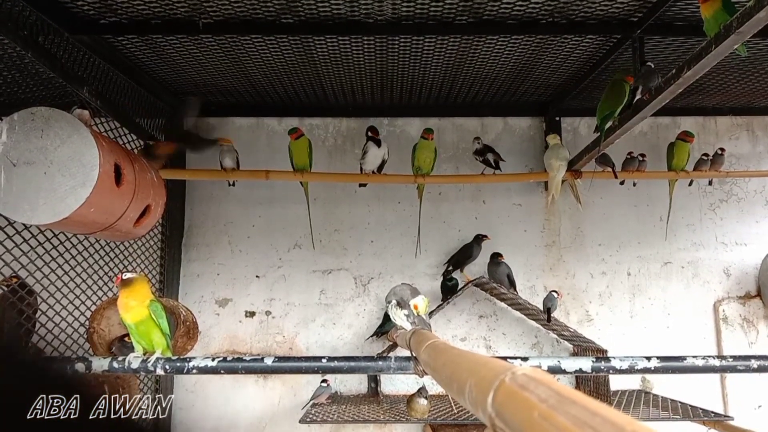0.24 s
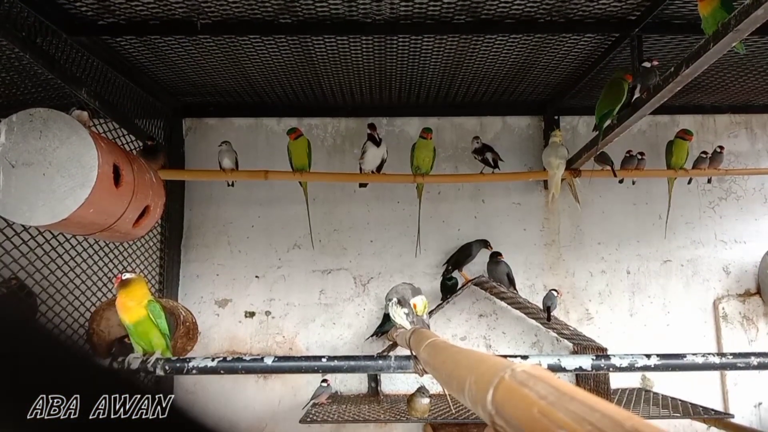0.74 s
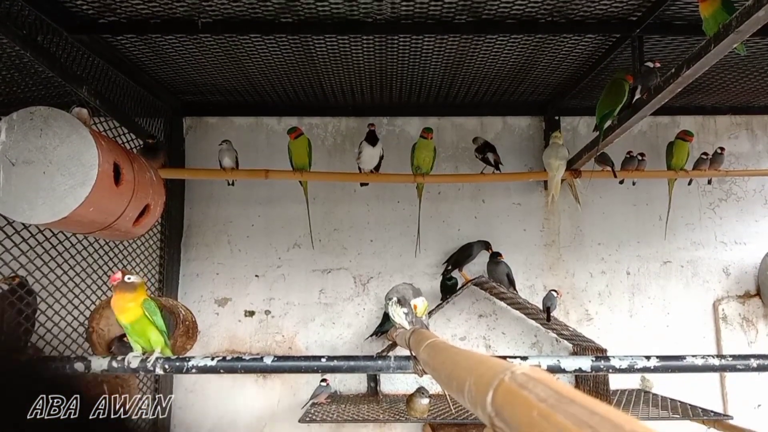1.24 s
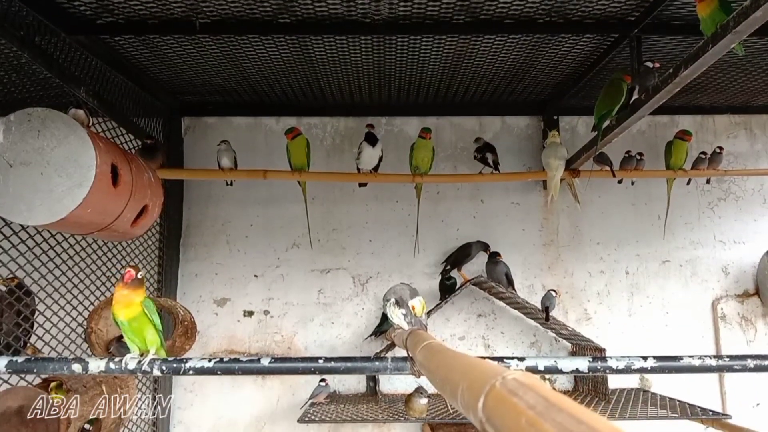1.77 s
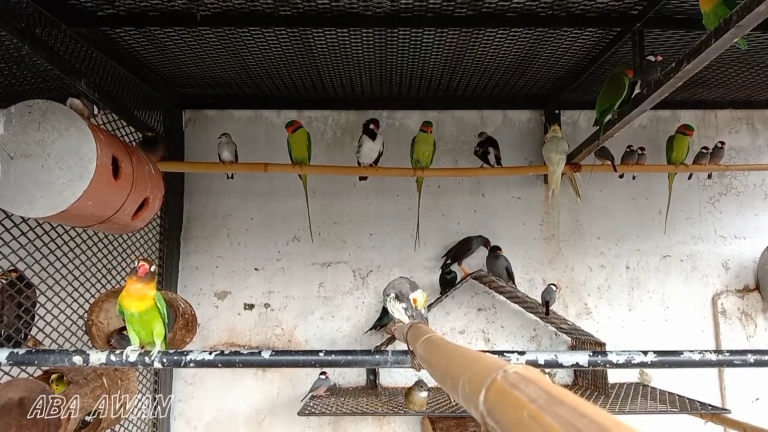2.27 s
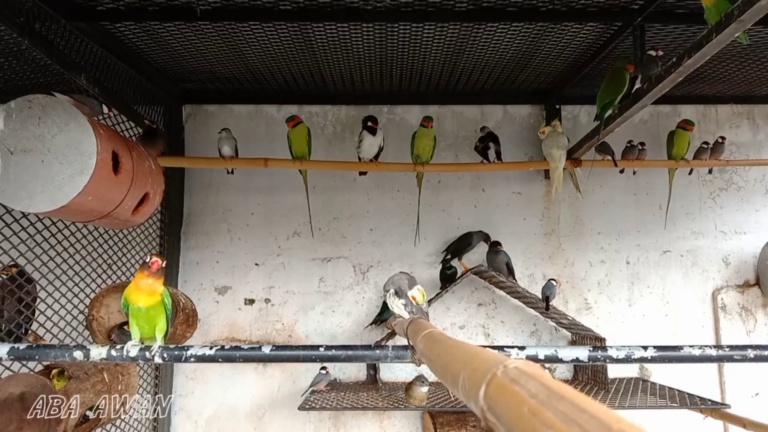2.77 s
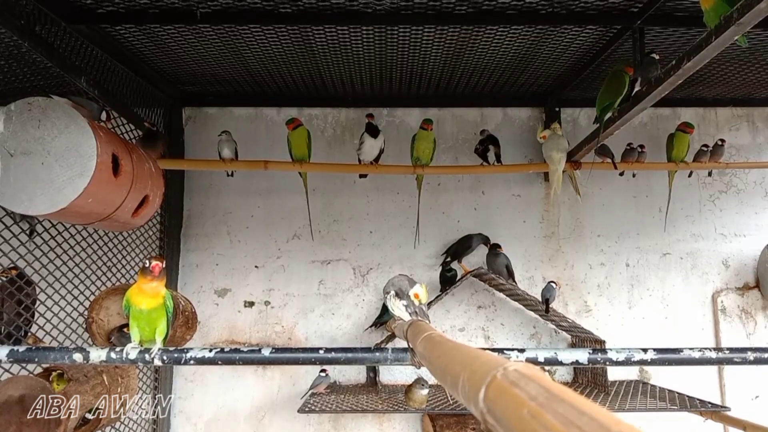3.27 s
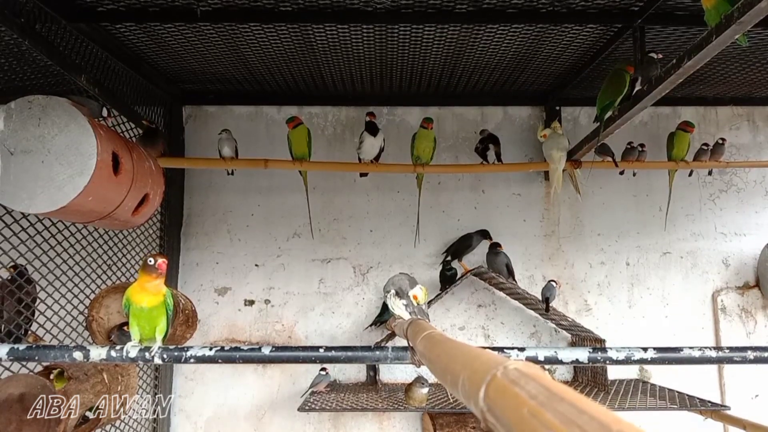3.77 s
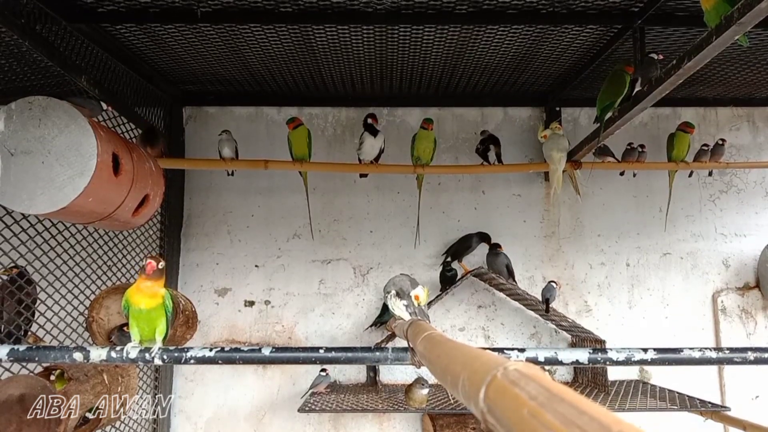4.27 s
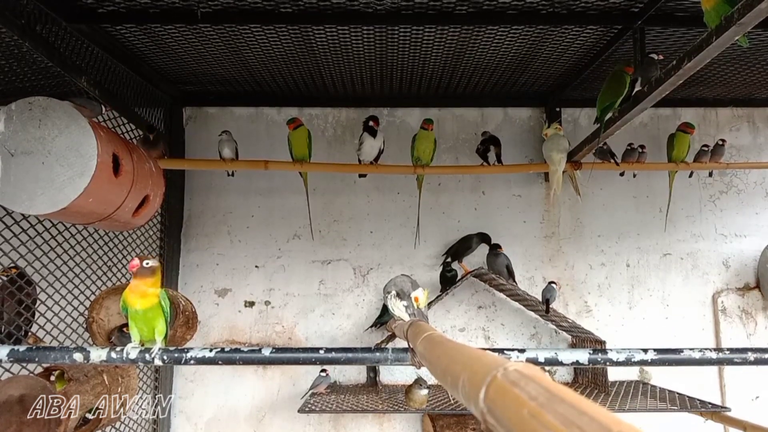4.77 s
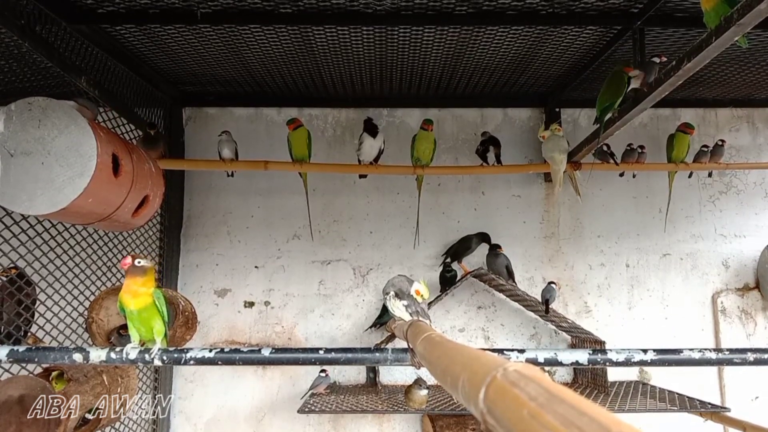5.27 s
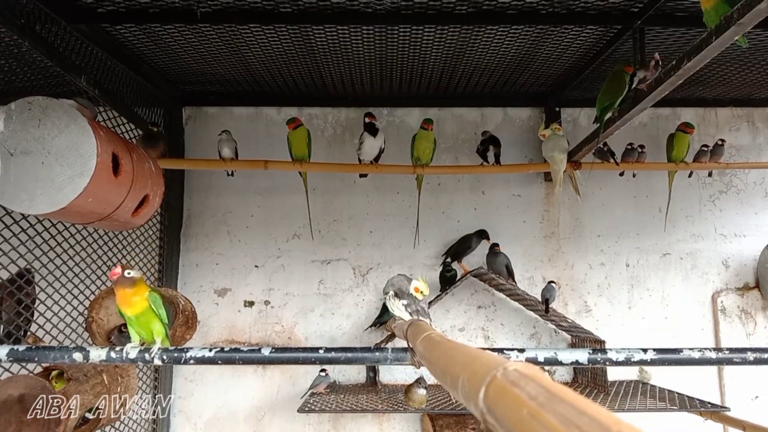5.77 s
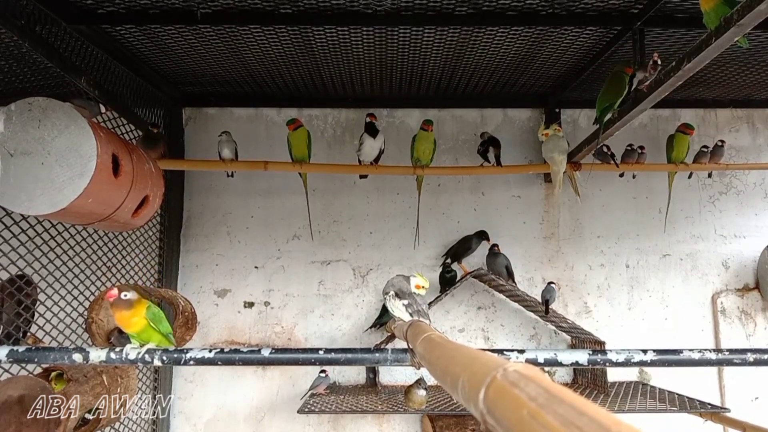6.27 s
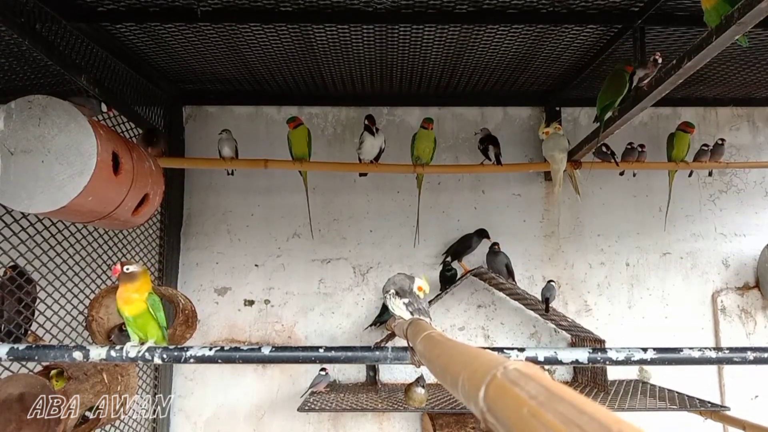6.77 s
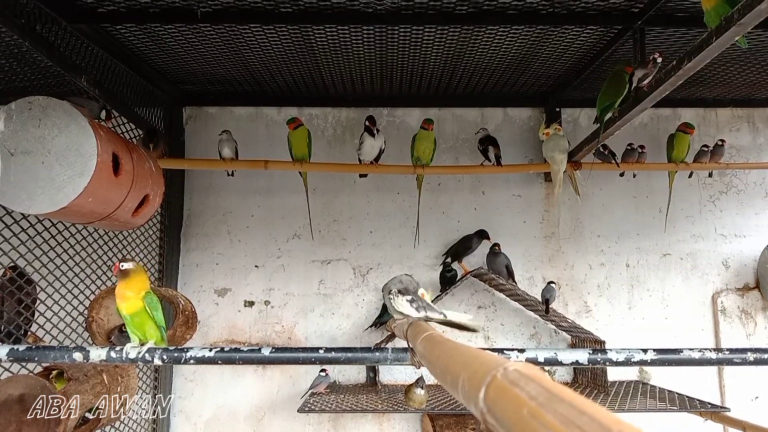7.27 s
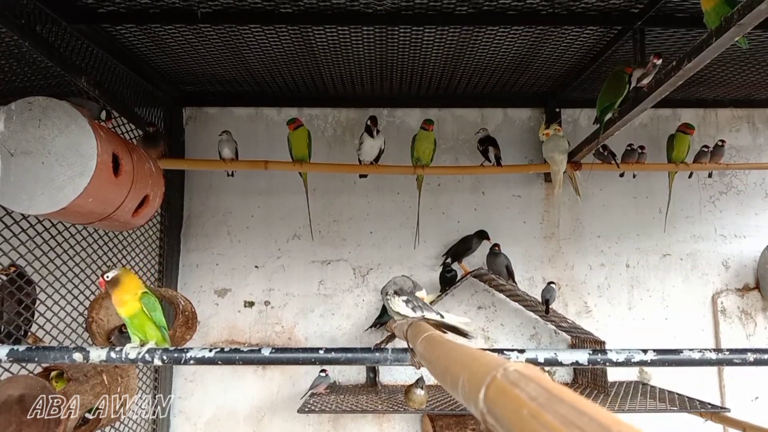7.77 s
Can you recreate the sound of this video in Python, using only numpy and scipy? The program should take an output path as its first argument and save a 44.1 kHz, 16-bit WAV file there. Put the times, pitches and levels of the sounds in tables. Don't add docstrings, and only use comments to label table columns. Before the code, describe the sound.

Sparse squawks and squeals in an echoing bird enclosure build to loud, quick finch chips, a fading trill and two smooth rise-and-fall whistles.

```python
import sys
import numpy as np
from scipy import signal
from scipy.fft import rfft, irfft, next_fast_len
from scipy.io import wavfile
from scipy.ndimage import uniform_filter1d, map_coordinates

SR = 44100
rng = np.random.default_rng(int(sys.argv[2]) if len(sys.argv) > 2 else 0)


def volts_from_db(level):
    exponent = np.asarray(level, float) / 20
    return 10 ** exponent


def dump_mix(stems):
    frames = np.atleast_2d(stems).T
    limited = np.clip(frames, -1, 1)
    pcm = np.round(limited * 32767).astype(np.int16)
    wavfile.write(sys.argv[1], SR, pcm)


N = 354563
TOP_HZ = 16100


def unit(x):
    return x / np.sqrt(np.mean(x ** 2) + 1e-20)


def along(points, hz):
    f, v = np.transpose(points)
    return np.interp(np.log(hz + 1), np.log(f + 1), v)


def wobble(n, rate):
    knots = rng.standard_normal(int(n * rate / SR) + 4)
    return map_coordinates(knots, [np.arange(n) * rate / SR])


def coloured(spectrum, n):
    m = next_fast_len(n + 512)
    gain = volts_from_db(along(spectrum, np.fft.rfftfreq(m, 1 / SR)))
    return unit(irfft(rfft(rng.standard_normal(m)) * gain, m)[:n])


def patchy(x, depth_db=5):
    z = signal.stft(x, nperseg=512)[2]
    field = uniform_filter1d(rng.standard_normal(z.shape), 4, 0)
    field = uniform_filter1d(field, 8, 1)
    return unit(signal.istft(z * volts_from_db(depth_db * unit(field)), nperseg=512)[1][:N])


def add(track, s, x):
    part = track[max(round(s * SR), 0):][:len(x)]
    part += x[:len(part)]


def traffic_and_yard():
    # time in seconds, level in dB.
    passing = [(0.0, -62), (0.4, -57), (0.65, -62), (0.92, -55), (1.1, -64.5), (2.4, -60), (2.6, -55),
               (3.3, -55), (3.6, -61), (4.3, -57), (4.7, -64), (5.2, -64), (5.45, -58), (5.7, -63),
               (6.4, -62), (6.55, -53.5), (7.45, -55), (8.04, -62)]
    # frequency in Hz, level in dB per Hz.
    rumble_spectrum = [(20, -27.5), (50, -14.5), (90, 3.5), (125, -5), (165, -2), (230, -18), (400, -30.5),
                       (1200, -103)]
    # frequency in Hz, level in dB per Hz.
    murmur_spectrum = [(120, -28), (250, -5), (500, -5.5), (1000, -8), (1500, -3), (1900, -11), (3000, -15),
                       (4200, -22), (7400, -31.5), (7800, -14), (10000, -25.5), (11500, -49.5),
                       (16000, -56.5)]
    traffic_db = np.interp(np.arange(N) / SR, *np.transpose(passing))
    rumble = volts_from_db(traffic_db - 0.5 + 4.3 * wobble(N, 21)) * coloured(rumble_spectrum, N)
    swing_db = 0.15 * (traffic_db - traffic_db.mean())
    return rumble + volts_from_db(-54 + swing_db) * patchy(coloured(murmur_spectrum, N))


def motor():
    # frequency in Hz, level in dB.
    tones = [(3138, -39), (3924, -48), (4705, -53.5), (5480, -59.5), (6272, -70)]
    # start in seconds, length in seconds, level in dB.
    spells = [
        (-.04, 1.79, -7.5),
        (1.983, 0.44, -9.5),
        (2.632, 0.51, -6.5),
        (3.25, .3, -9),
    ]
    t = np.arange(N) / SR
    running, whine = np.zeros(N), np.zeros(N)
    for s, length, db in spells:
        running += volts_from_db(db) * np.clip(np.minimum(t - s, s + length - t) / 0.063, 0, 1)
    for hz, db in tones:
        whine += volts_from_db(db + 4 * wobble(N, 9)) * np.sin(2 * np.pi * hz * t + 0.89 * wobble(N, 42))
    return running * whine


def aviary(x):
    # frequency in Hz, decay time to -60 dB in seconds.
    decay_times = [(300, 0.046), (1500, 0.34), (5000, 0.26), (12000, 0.25)]
    hz, t, z = signal.stft(rng.standard_normal(SR // 2), SR, nperseg=256)
    decay = volts_from_db(-60 * t / along(decay_times, hz)[:, None])
    tail = signal.istft(z * decay, SR, nperseg=256)[1]
    delayed = np.pad(x, (150, 0))
    return signal.fftconvolve(delayed, tail / np.linalg.norm(tail))[:N]


def syrinx(hz, levels_db, rough, flutter_hz, breath_db=-30):
    n = len(hz)
    hoarse = 0.45 * volts_from_db(breath_db) * wobble(n, 900)
    phase = 2 * np.pi * np.cumsum(hz * (1 + rough * wobble(n, flutter_hz))) / SR + hoarse
    tone = np.zeros(n)
    for k, db in enumerate(levels_db, 1):
        tone += volts_from_db(db) * np.sin(k * phase) * (k * hz < TOP_HZ)
    swing = volts_from_db(60 * rough * wobble(n, flutter_hz))
    breath = volts_from_db(breath_db) * wobble(n, 1800) + volts_from_db(breath_db - 19) * wobble(n, 9000)
    return np.sqrt(2) * tone * (swing + breath)


def calls(tables, rough, flutter_hz, breath_db, upper_db, octave_db=None, edge=0.0036):
    track = np.zeros(N)
    for rows in tables:
        s, *cols = np.transpose(rows)
        t = np.arange(s[0], s[-1], 1 / SR)
        smooth = 100 + round(edge * SR)
        hz, db, *second = [uniform_filter1d(np.interp(t, s, c), size=smooth) for c in cols]
        octave = second[0] if second else db + octave_db
        fade = np.clip(np.minimum(t - s[0], s[-1] - t) / edge, 0, 1)
        levels = [db, octave] + [octave + u for u in upper_db]
        add(track, s[0], fade * syrinx(hz, levels, rough, flutter_hz, breath_db))
    return track


def contour(rows, peak_at, bent, rise_db, fall_db):
    return [[(s, a, db - rise_db), (s + peak_at * length, a + bent * (b - a), db), (s + length, b, db - fall_db)]
            for s, length, a, b, db in rows]


def far_birds():
    # start in seconds, length
    # in seconds, first and last pitch in Hz, peak in dB.
    warbles = [(0.235, 0.057, 3350, 2667, -39), (4.56, 0.055, 3095, 3560, -36),
               (0.56, 0.046, 2690, 2610, -44), (0.73, 0.2, 2780, 2960, -50), (2.78, .05, 1900, 2000, -41),
               (2.81, .12, 2500, 2950, -39), (7.73, .06, 5200, 6100, -42), (7.73, .05, 8000, 8500, -46),
               (3.2, 0.19, 1978, 3200, -37), (4.33, 0.12, 3580, 2473, -36.5), (4.79, 0.03, 2500, 2994, -44),
               (4.95, 0.2, 3790, 4410, -40), (5.36, 0.092, 2442, 3230, -30), (5.6, 0.08, 2786, 3270, -36.5)]
    # start in seconds, length in seconds, first and last pitch in Hz, peak in dB.
    pips = [(0.11, 0.046, 2985, 2440, -37.5), (.17, 0.06, 2125, 1750, -48), (0.63, 0.033, 3010, 2610, -41),
            (1.37, 0.078, 2172, 1810, -41.5), (1.67, 0.036, 1800, 1970, -35), (2.6, 0.09, 3250, 3550, -35),
            (4.53, 0.072, 2730, 2736, -36.5), (4.725, 0.051, 2630, 2590, -37), (4.83, .05, 3585, 3045, -35),
            (5.06, .13, 2050, 2450, -36), (5.255, 0.065, 3000, 3400, -32), (5.885, .07, 3900, 3200, -35),
            (5.62, .04, 3700, 3000, -35), (5.37, 0.038, 3100, 3300, -35), (0.62, .05, 2600, 4000, -47.5),
            (0.644, 0.045, 4100, 3700, -44), (0.75, 0.091, 1900, 1300, -53), (2.73, .05, 5000, 3400, -43),
            (1.38, 0.058, 3100, 2500, -49), (1.68, 0.048, 2700, 2500, -43.5),
            (7.33, 0.17, 2086, 3270, -49.5), (7.68, 0.02, 4200, 2660, -32),
            (7.32, 0.073, 4100, 4950, -47.5)]
    # start in seconds, length in seconds, first and last pitch in Hz, peak in dB.
    dove_coos = [
        (3.27, 0.116, 800, 900, -57),
        (3.47, 0.16, 850, 800, -52),
        (3.75, 0.18, 1248, 896, -53),
        (0.76, 0.122, 750, 680, -58),
        (3.83, 0.12, 292, 308, -49),
        (4.05, .18, 280, 345.5, -51.5),
        (6.82, .2, 319, 319, -53.5),
        (7.1, .19, 343, 312, -49),
        (1.55, 0.12, 297, 320, -61.5),
    ]
    # start in seconds, length in seconds, pitch in Hz, level in dB.
    drones = [
        (1.198, 0.061, 1630, -47.5),
        (2.019, 0.06, 1196, -49),
        (2.233, 0.12, 1637, -57),
        (2.284, 0.062, 1230, -53),
        (2.572, 0.23, 1315, -55),
        (3.241, 0.25, 1280, -54),
        (3.4, 0.17, 1200, -58),
        (3.77, 0.13, 473, -55.5),
        (7.695, 0.11, 1340, -53.5),
        (4.866, 0.069, 1904, -39),
    ]
    songs = contour(warbles, .6, 1.0, 5.1, 0.75) + contour(pips, .1, 0.3, 3.9, 7.7)
    coos = contour(dove_coos, 0.24, .45, 1.4, 3.7)
    steady = [[(s, hz, db), (s + length, hz, db)] for s, length, hz, db in drones]
    stutter = volts_from_db(3 * wobble(N, 60))
    far = stutter * calls(songs, .04, 220, -12, [], -32, .01)
    return far + volts_from_db(4 * wobble(N, 14)) * calls(coos + steady, .015, 40, -14, [], -30, .02)


def knocks():
    # time in seconds, peak in dB.
    ticks = [
        (0.5824, -47),
        (2.704, -30.5),
        (2.7535, -53),
        (2.8003, -39),
        (2.846, -34.5),
        (3.223, -35.5),
        (3.244, -27),
        (3.3656, -32.5),
        (6.177, -30),
        (6.282, -26),
    ]
    # time in seconds, level in dB, frequency in Hz.
    s_perch, db_perch, hz_perch = (7.81, -31, 160)
    beak = [(4000, -36), (5500, 17), (10000, -4.5), (11000, -67), (16000, -90)]  # Hz, dB per Hz
    track, t = np.zeros(N), np.arange(SR // 10) / SR
    for s, db in ticks:
        add(track, s, volts_from_db(db - 60 * t / 0.013) * (1 - np.exp(-t / 0.0005)) * coloured(beak, len(t)))
    envelope = volts_from_db(db_perch - 60 * t / 0.11) * (1 - np.exp(-t / 0.0086))
    add(track, s_perch, envelope * np.sin(2 * np.pi * hz_perch * t))
    return track


def rasps():
    # time in seconds, peak in dB,
    # length in seconds, brightness in dB per octave.
    squawks = [(0.246, -25.5, 0.16, -2), (0.333, -16.5, 0.096, 8), (1.83, -43, 0.08, 4),
               (2.51, -40, 0.098, 5), (3.7, -18, .09, 11), (4.3, -18, .1, 8), (3.92, -21.5, .1, 9.5),
               (4.4, -25, .1, 16.5), (3.57, -29.5, .1, 12.5), (7.94, -24, 0.087, 10), (8.02, -23, .07, 4),
               (1.4, -38, .06, -4), (6.2, -24.5, .14, 13), (1.944, -32, 0.32, -4), (2.575, -21, 0.11, 3.5),
               (2.74, -28.5, 0.11, -2), (3.2663, -24.5, 0.13, 1.5), (4.35, -30, 0.13, 3),
               (5.065, -15.5, 0.094, 2.5), (5.1825, -23, 0.26, 1.5), (5.4655, -15, 0.12, 1),
               (5.688, -19.5, 0.096, -1), (5.9023, -20.5, 0.12, -2), (6.11, -19.5, 0.15, -0.5),
               (7.892, -27.5, 0.06, 5.5), (7.202, -29.5, 0.11, -7), (1.119, -24, 0.12, 13.5),
               (0.628, -48, 0.37, 12)]
    # frequency in Hz, level in dB per Hz.
    throat = [(300, -90), (700, -35), (1400, -13), (2000, -15), (2800, -2), (4100, -15), (5400, -8),
              (6800, -19), (8000, -16), (9200, -38), (14000, -33), (16000, -48)]
    track = np.zeros(N)
    for s, db, length, bright_db in squawks:
        n = round(length * SR) + 99
        u = np.arange(n) / n
        tilted = [(hz, level + bright_db * np.log2(hz / 3000)) for hz, level in throat]
        wide = coloured([(hz * 1.04, level) for hz, level in tilted], n)
        shut = coloured([(hz * 0.9, level) for hz, level in tilted], n)
        gate = volts_from_db(2.2 * wobble(n, 300.5)) * np.sin(np.pi * u) ** 2
        add(track, s - .03, volts_from_db(db - 10) * gate * (np.sqrt(1 - u) * wide + np.sqrt(u) * shut))
    return track


def pipers():
    # start in seconds, length in seconds, first and last pitch in Hz, peak in dB.
    piping = [
        (6.338, 0.14, 2850, 2706, -25),
        (6.558, 0.13, 3000, 2681, -22),
    ]
    # time in seconds, pitch in Hz, fundamental in dB, octave in dB.
    rise = [
        [(7.7, 1212, -58, -44.5), (7.75, 1425, -56, -31.5), (7.8, 1615, -40.5, -30), (7.85, 1715, -40.5, -27.5),
         (7.93, 1690, -55, -25.5), (8.0, 1714, -62, -44.5)],
    ]
    piped = calls(contour(piping, 0.06, .7, 9.5, 4), 0.0058, 200, -23.5, [-4, -22], -14.0)
    return piped + calls(rise, 0.004, 160, -15, [-25, -23.5, -18.5, -31, -34.5])


def whistler():
    # time in seconds, pitch in Hz, level in dB.
    arches = [
        [(4.45, 1070, -41), (4.554, 1174, -21), (4.64, 1364, -22.5), (4.724, 1603, -23), (4.836, 1764, -27),
         (4.88, 1740, -34), (4.93, 1543, -26), (5.04, 1036, -32.5), (5.12, 960, -62)],
        [(6.765, 1032, -35), (6.93, 1168, -19.5), (7.0, 1354, -20), (7.11, 1830, -23), (7.22, 1928, -28),
         (7.3, 1603, -20), (7.36, 1190, -23.5), (7.42, 924, -38), (7.52, 850, -52.5)],
    ]
    return calls(arches, .003, 60, -42, [], -70, .025)


def chips(rows, length, drop, fall, sag, half_db, breath_db, lead, early=1):
    track, t = np.zeros(N), np.arange(1, round(length * SR)) / SR
    swing = np.abs(np.sin(np.pi * (t / length) ** early)) + 1e-6
    for s, db, hz, octave_db in rows:
        onset = drop * rng.uniform(0.7, 1.2) * np.exp(-((t - lead / 2) / fall) ** 2)
        glide = hz / 2 * (1 + onset - sag * (t / length) ** 3)
        upper = db - 11.0 + octave_db + 20 * np.log10(swing)
        levels = [db - 13.5 + half_db, db - 7.5, db - 16 + half_db, upper, db - 27.5 + half_db, upper - 8]
        add(track, s - lead, swing * syrinx(glide, levels, 0.024, 457, breath_db))
    return track


def finches():
    # time in seconds, peak in dB, pitch in Hz, octave in dB.
    series = [
        (4.2725, -6.5, 5500, -9),
        (4.4566, -7.5, 5580, -14),
        (4.5136, -8.5, 5086, -3.5),
        (4.6635, -6.5, 5450, -5.5),
        (4.7791, -6.5, 5310, -7.5),
        (4.8899, -7, 5480, -10.5),
        (4.9988, -8.5, 5490, -11.5),
        (5.1, -5, 5520, -14),
        (5.1862, -7, 5245, -12),
        (5.2983, -5, 5230, -12.5),
    ]
    # time in seconds, peak in dB, pitch in Hz, octave in dB.
    trill = [
        (6.461, -10, 5470, -34),
        (6.5445, -9.5, 5295, -50),
        (6.6257, -12.5, 5240, -39.5),
        (6.6972, -15, 5483, -36),
        (6.767, -12, 5440, -58),
        (6.8316, -15, 5270, -37.5),
        (6.8995, -17, 5400, -26),
        (6.971, -22.5, 5470, -38),
        (7.0675, -24.5, 5280, -37),
    ]
    # time in seconds, peak in dB, pitch in Hz, octave in dB.
    chatter = [
        (0.119, -37, 5340, -26),
        (0.205, -39.5, 4920, -22),
        (3.6025, -7.5, 5420, -12.5),
        (6.2815, -13, 4755, -16),
        (7.82, -29, 4410, -27),
    ]
    # time in seconds, peak in dB, pitch in Hz, octave in dB.
    flicks = [(1.323, -13.5, 5890, -13), (2.572, -17, 4920, -33), (3.688, -8.5, 5435, -6.5),
              (3.715, -13, 5110, -8), (3.8218, -9, 4904, -6.5), (3.838, -9, 5110, -7),
              (3.8702, -9, 5214, -11.5), (3.885, -13, 4970, -12), (3.9035, -7, 5560, -12),
              (3.925, -14.5, 5710, -7.5), (3.9477, -7.5, 5395, -12.5), (7.959, -8.5, 5340, -9.5),
              (8.003, -11, 5180, -11.5), (8.016, -5.5, 5540, -16), (8.032, -8, 5800, -12.5)]
    flock = chips(series, 0.032, .28, .003, 0.03, -26, -19, 0.007, early=.7)
    flock += chips(trill, 0.024, 0.13, 0.012, 0.034, -17, -21, 0.009)
    flock += chips(chatter, 0.0232, 0.04, 0.0063, .05, -16, -11, 0.0074)
    return flock + chips(flicks, 0.017, -0.1197, 0.00486, -0.038, -14, -7, .004, early=.8)


def parrots():
    # time in seconds, pitch in Hz, fundamental in dB, octave in dB.
    arch = [
        [(1.012, 2550, -34.5, -16), (1.03, 3715, -25, -34), (1.05, 3220, -22.5, -21.5),
         (1.075, 3004, -34.5, -21), (1.1, 3184, -29.5, -32), (1.16, 3150, -41, -33)],
    ]
    # time in seconds, pitch in Hz, fundamental in dB, octave in dB.
    screech = [
        [(7.914, 2300, -44, -20.5), (7.925, 2250, -38, -23), (7.945, 2400, -31, -22), (7.97, 2417, -35, -25.5),
         (8.0, 2430, -34, -27), (8.04, 2442, -40, -36)],
    ]
    # start in seconds, length in seconds, first and last pitch in Hz, peak in dB.
    squeals = [
        (1.22, 0.046, 3486, 2752, -30),
        (0.42, .055, 2395, 2418, -31.5),
        (2.0, 0.059, 3725, 3230, -35),
        (3.405, 0.035, 2564, 2725, -27.5),
        (3.53, 0.094, 3457, 2956, -27),
        (4.0, 0.054, 2950, 3166, -27),
    ]
    shrieks = [
        (1.1, 0.071, 3906, 4224, -25),
        (1.235, 0.03, 5750, 3930, -24.5),
        (1.945, 0.05, 5220, 5010, -26.5),
        (3.67, .08, 4040, 5330, -29),
        (4.04, 0.028, 4800, 4010, -24.5),
    ]
    quacks = [
        (0.65, 0.014, 1970, 2020, -32.5),
        (1.355, 0.085, 1318, 1328, -29),
        (1.665, 0.067, 1298, 1380, -33.5),
        (1.94, 0.11, 1804, 2088, -37),
        (4.16, 0.087, 1880, 2020, -39.5),
    ]
    cheeps = [
        (1.53, 0.021, 2470, 2380, -40.5),
        (1.91, 0.065, 2458, 2580, -39.5),
    ]
    scolds = [
        (.298, 0.084, 1367, 1671, -30.5),
        (.485, 0.081, 1492, 2073, -33.5),
        (4.31, .13, 1800, 1250, -36),
        (1.8, 0.05, 1500, 1534, -42.5),
        (2.11, 0.061, 1492, 1367, -41),
    ]
    mellow = [
        (6.177, 0.06, 5340, 5110, -27),
        (6.185, 0.037, 3230, 3500, -32.5),
        (6.225, .06, 3625, 2987, -26.5),
        (6.305, 0.045, 6880, 5770, -23.5),
        (6.22, .035, 7000, 7500, -31),
        (6.25, .03, 6800, 5900, -31),
        (1.12, .06, 3400, 4600, -29),
        (3.88, .018, 7750, 6970, -26.5),
        (3.915, 0.028, 7900, 8650, -26.5),
    ]
    flock = calls(arch, 0.036, 491.7, -31, [-10, -9, -14])
    flock += calls(contour(squeals, 0.38, 0.86, 5.9, 12.6), 0.022, 480, -18.0, [-9, -13, -13], 4.84)
    flock += calls(contour(shrieks, .3, 0.36, 5.8, 7.9), .016, 500, -14, [-6, -12, -16], -6)
    quack_upper_db = [-7.0, -28, -21, -11, -24.0]
    flock += calls(contour(quacks, .4, 0.54, 20.0, 9.3), 0.049, 300.2, -18.5, quack_upper_db, -21.5)
    flock += calls(contour(cheeps, 0.45, 0.56, 2.1, 28.4), 0.06, 399, -10, [-8, -20], -6.5)
    flock += calls(contour(scolds, .35, .6, 3.3, 22), .025, 350, -11, [-3, 1, -11, -12, -18], 2, edge=.008)
    flock += calls(screech, .012, 480, -17, [-7, -15.5, -5, -14], edge=.0015)
    flock += calls(contour(mellow, .3, .4, 4, 6), .018, 450, -11.5, [-10], -24)
    return flock + knocks()


def scene():
    mix = traffic_and_yard() + motor()
    groups = [(far_birds(), 3.5, 4.5), (rasps(), 2.0, -4), (pipers(), 2.5, 0.5),
              (whistler(), 6.5, -2.5), (finches(), 1.5, -2.0), (parrots(), 4.0, 2.5)]
    for birds, direct_db, echo_db in groups:
        mix += volts_from_db(direct_db) * birds + volts_from_db(echo_db) * aviary(birds)
    return mix[None]


def low_pass(x):
    return signal.sosfilt(signal.butter(12, 16470, fs=SR, output="sos"), x)


def record(dry):
    soft = dry / (1 + np.abs(dry / .85) ** 6) ** (1 / 6)
    m = next_fast_len(N)
    passed = np.fft.rfftfreq(m, 1 / SR) < TOP_HZ
    band = irfft(rfft(soft, m) * passed, m)[..., :N]
    return low_pass(band)


dry = scene()
out = record(dry)
dump_mix(out)
```